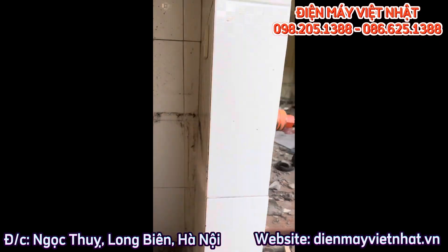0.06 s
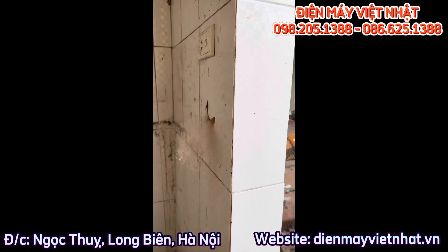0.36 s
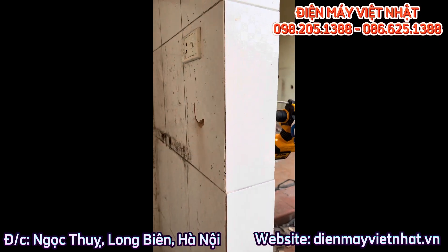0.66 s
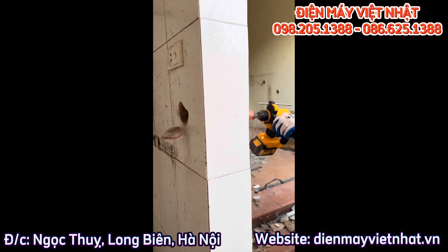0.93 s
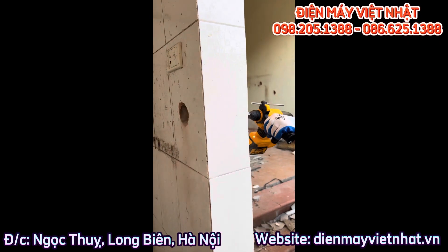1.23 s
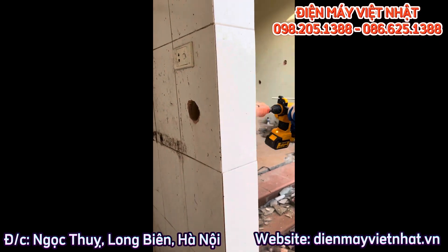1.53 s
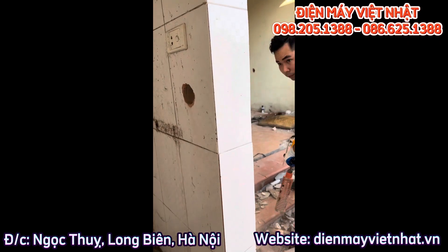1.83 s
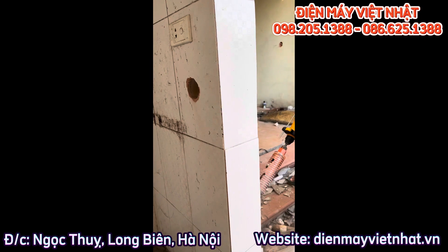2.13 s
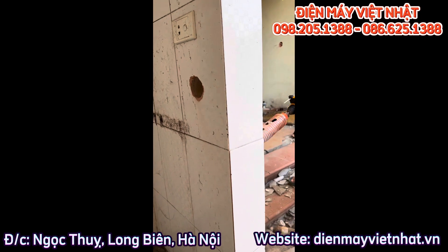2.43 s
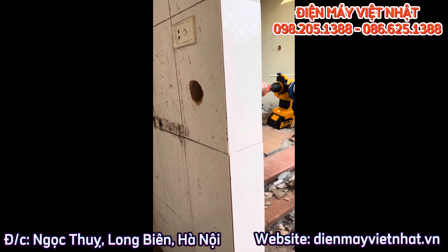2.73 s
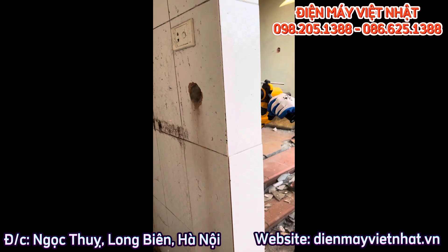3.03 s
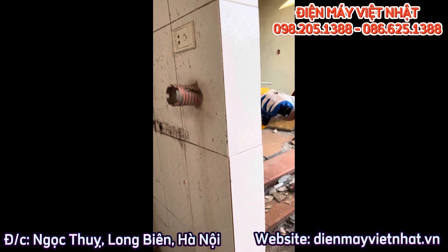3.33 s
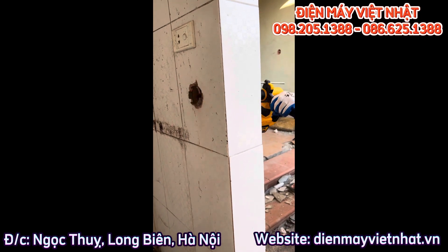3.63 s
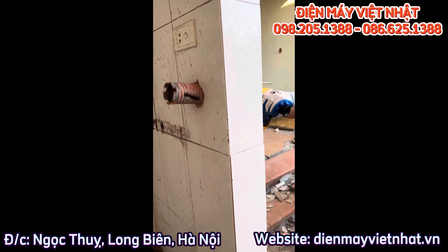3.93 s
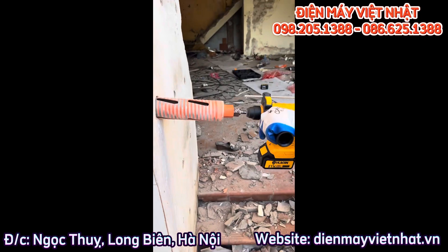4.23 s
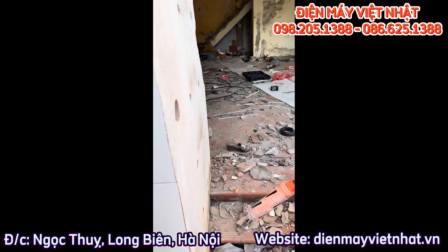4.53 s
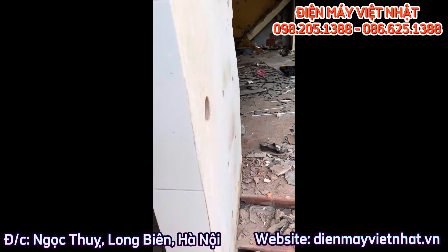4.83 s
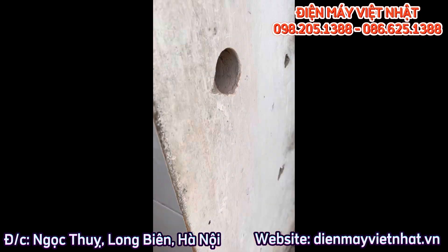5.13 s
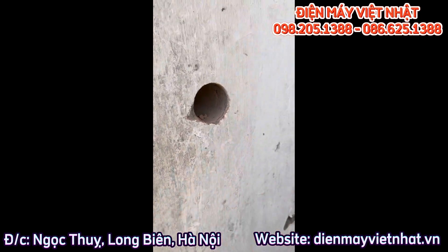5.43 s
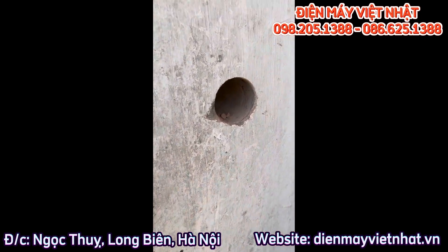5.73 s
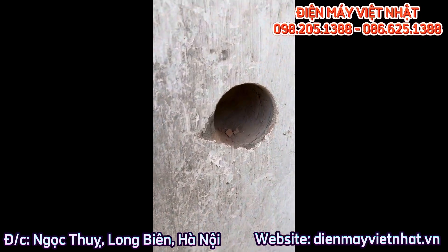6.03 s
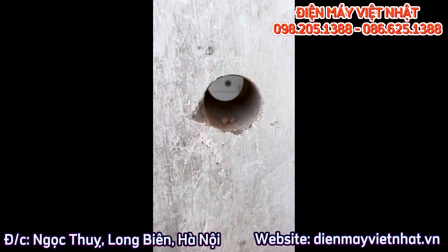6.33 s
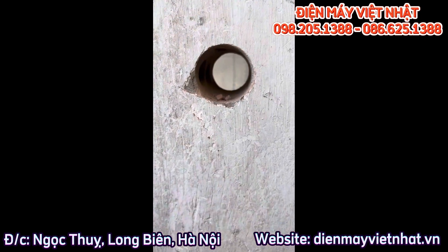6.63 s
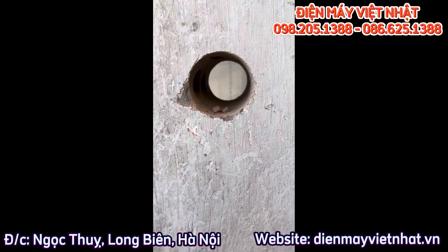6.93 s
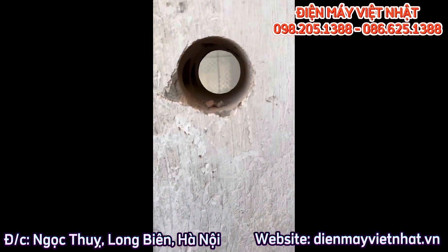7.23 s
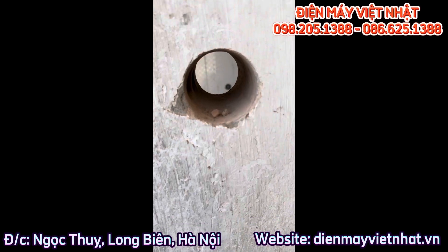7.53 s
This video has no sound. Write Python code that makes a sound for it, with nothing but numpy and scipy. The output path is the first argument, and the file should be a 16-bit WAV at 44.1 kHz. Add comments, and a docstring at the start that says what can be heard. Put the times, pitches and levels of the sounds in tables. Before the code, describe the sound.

Close up in a bare room, a hammer drill pounds and grinds against masonry in three quick runs. Gritty scrapes and small cracks fill a gap before one more run goes through the wall. The hollow steel bit rasps out of the hole, knocks the rim and gives a short metallic ring. Then shoes scuff and crunch across broken rubble, growing faint, while air lightly buffets the microphone.

```python
"""In a gutted room, a cordless rotary hammer drives a steel core bit through a tiled masonry wall.
Periodic impacts make the wall thud, while teeth crushing grit radiate broadband noise. The bit is
drawn out, put back, breaks through and rubs in the hole; friction and knocks excite the modes of its
tube, which rings as it comes free. Then steps crunch over rubble close by, a train of small
fractures, while air buffets the microphone."""
import sys
import numpy as np
from scipy import signal
from scipy.fft import rfft, irfft, next_fast_len
from scipy.io import wavfile
from scipy.ndimage import uniform_filter1d

SR = 44100
rng = np.random.default_rng(int(sys.argv[2]) if len(sys.argv) > 2 else 0)


def store_wav(level_fs):
    """Save 16-bit WAV to argv[1]."""
    pcm = np.round(np.clip(np.atleast_2d(level_fs), -1, 1) * 32767)
    wavfile.write(sys.argv[1], SR, pcm.T.astype(np.int16))


N = 342657
TIME = np.arange(N) / SR
CUTOFF_HZ = 15900
GRIT_SWING_DB, GRIT_SHIFTS_PER_S = 3.5, 45  # loose grit and a moving contact favour changing pitches

# Three pushes deep in the wall, then one through it. Each row: start, length and bite time in seconds,
# thud and grinding levels in dB, blows per second, and the sag of that rate per second.
PUSHES = [(-0.04, 0.34, 0.058, -32.5, -27, 69.5, 13.14), (0.385, 0.45, 0.033, -26.5, -26.5, 66.9, 1.79),
          (1.012, 0.33, 0.14, -30.5, -24.5, 67.2, 6), (2.929, 0.38, 0.053, -24, -21, 67.3, 1.82)]
# The bit slips and lands lightly. Each row: centre and half length in seconds, dip of the thud in dB.
SLIPS = [(1.213, 0.017, -11), (2.977, 0.033, -9.5), (3.22, 0.021, -4.5)]
def drilling():
    """Impact excitation: one train of blows drives both the wall's thud and the teeth's grinding."""
    blows = blow_count()
    slip_db = sum(db * np.exp(-np.minimum(((TIME - s) / half) ** 2, 20)) for s, half, db in SLIPS)
    thuds = amp(1 + slip_db) * wall_thuds(blows)
    teeth = amp(0.088 * slip_db) * grinding(blows) * amp([[.5], [-.5]])
    return thuds + teeth


def blow_count():
    """Phase is the integral of rate: blows so far, at a speed that sags and wavers under load."""
    speed = []
    for start, length, *_, rate, sag in PUSHES:
        speed += [(start, rate), (start + length, rate - sag * length)]
    return np.cumsum(curve(speed) * (1 + .007 * drift(35))) / SR


def contact_force(push, arch_db, fall_db_per_s, yield_db_per_s, break_s=3.122):
    """Force needs resistance: it arches over a push and fades once the wall gives way."""
    start, length, bite = push[:3]
    off_centre = np.clip(2 * (TIME - start) / length - 1, -1, 1)
    resistance = amp(-yield_db_per_s * np.maximum(TIME - break_s, 0))
    return stroke(start, length, bite, fall_db_per_s) * amp(-arch_db * off_centre ** 2) * resistance


def thud_gain(push, build_db=8.5):
    """Coupling to the wall grows as the teeth dig in, so the thud builds through a push."""
    start, length, _, thud_db = push[:4]
    dug_in = np.clip((TIME - start) / length, 0, 1) - .5
    force = contact_force(push, arch_db=5.5, fall_db_per_s=257, yield_db_per_s=42)
    return amp(thud_db + build_db * dug_in) * force


def grind_gain(push):
    """Grinding amplitude follows the contact force on the teeth."""
    return amp(push[4]) * contact_force(push, arch_db=0.5, fall_db_per_s=243.5, yield_db_per_s=26.5)


WALL_RATE_HZ = 67.1  # nominal blow rate
# The wall's response in each push, changing as the hole deepens.
# Each entry: level in dB at 1, 2, 3, .. times the nominal blow rate.
WALL_FIRST_DB = [-33.5, -20, -2, -9, -5, 1.5, -1, -1, 1.5, 0, 7.5, -10, -4]
WALL_SECOND_DB = [-41, -13.5, -10.5, -23, -5.5, -13.5, 3.5, -2, -6, -9, 0, -13, -14, -14]
WALL_THIRD_DB = [-38, -4.5, -7, -19, -5.5, -6.5, 2, -6, 3.5, -4.5, -2, -7, -8.5]
WALL_THIN_DB = [-27.5, -8, -9, -12, -12.5, -15, 8.5, -12.5, -7, -6.5, -15, -1, -15.5, -7]
def wall_thuds(blows, rattle_gain=0.36):
    """Forced vibration: the wall filters uneven blows and their rattle; harmonics waver under load."""
    thuds = 0
    for push, wall in zip(PUSHES, [WALL_FIRST_DB, WALL_SECOND_DB, WALL_THIRD_DB, WALL_THIN_DB]):
        clicks = rms_one(np.diff(np.floor(blows), prepend=0) * amp(1.4 * drift(50)))
        rattle = rms_one(np.exp(-(blows % 1) / 0.74) * rng.standard_normal(N))
        harmonics = [(k * WALL_RATE_HZ, db) for k, db in enumerate(wall, 1)]
        thud = colour(clicks + rattle_gain * rattle, harmonics + [(1500, -21.5), (3000, -48.5)])[0]
        thuds += thud_gain(push) * bending_waves(thud)
    return restless(thuds, WALL_RATE_HZ * np.arange(5, 15), swing_db=2.5, per_s=11)


def bending_waves(thud, delay_at_blow_rate_s=.1, spread=0.77):
    """Dispersion: lower bending waves travel more slowly through the wall, which smears each blow."""
    size = 2 * next_fast_len(N // 2 + 1)
    hz = np.fft.rfftfreq(size, 1 / SR)
    lag_cycles = 2 * delay_at_blow_rate_s * np.sqrt(hz * WALL_RATE_HZ)
    waves = rfft(thud, size) * np.exp(-2j * np.pi * lag_cycles)
    # above the bass, standing waves reach left and right out of phase
    side = irfft(waves * np.exp(1j * np.pi / 3.4) * hz ** 2 / (hz ** 2 + 220 ** 2))[:N]
    return irfft(waves)[:N] + spread * side * [[1], [-1]]


# Teeth on masonry, deep in the wall and breaking through. Each row: frequency in Hz, level in dB.
GRIND_DEEP = [(530, -17), (900, -2), (1130, -9.5), (1720, -7), (1890, -9.5), (2550, -6), (3400, -10.5),
              (5240, -3), (7510, -17.5), (8680, -11.5), (10600, -20), (14200, -12.5), (15800, -24)]
GRIND_THROUGH = [(530, -13.5), (900, -7), (2200, -13.5), (2490, -5), (3290, -11.5), (3530, -6), (4080, -7),
                 (5370, -3), (7420, -23.5), (8370, -15), (10600, -20.5), (14000, -11.5), (15800, -28.5)]
def grinding(blows):
    """Crushing noise is broadband: its colour keeps shifting and is brighter in the last push."""
    deep = crushed_grit(blows, GRIND_DEEP, pulsing=0.049, tube_db=-12) * sum(map(grind_gain, PUSHES[:-1]))
    through = crushed_grit(blows, GRIND_THROUGH, pulsing=0.055, tube_db=-4.5) * grind_gain(PUSHES[-1])
    teeth = amp(0.5) * deep + amp(1) * through
    return restless(teeth, np.geomspace(1500, 6500, 10), swing_db=1.9, per_s=28)


# Modes of the tube gripped by the hole. Each row: frequency and bandwidth in Hz, level in dB.
GRIPPED_MODES = [(2900, 210, -8), (3533, 70, 0.5), (5180, 70, -6), (5510, 110, -4), (5930, 200, -10),
                 (8600, 130, -13)]
def crushed_grit(blows, spectrum, pulsing, tube_db):
    """Random excitation: grit breaks, a little harder at each blow, and sets the gripped tube singing."""
    grit = grains(14000, 0.61, 500) * (1 + pulsing * np.cos(2 * np.pi * blows)) * amp(0.27 * drift(90))
    singing = sum(amp(db + 3.5 * drift(25)) * resonate(grit, hz, width) for hz, width, db in GRIPPED_MODES)
    return steel(colour(grit, spectrum)) + amp(tube_db) * rms_one(singing)


def steel(x, t60=0.025, share=0.35, size=3000):
    """High modal density: the tube's close upper modes give a metallic grain to what excites it."""
    modes = rng.standard_normal((1, size)) * amp(-60 * np.arange(size) / SR / t60)
    upper = signal.sosfiltfilt(signal.butter(2, 4500, "high", fs=SR, output="sos"), x)
    ringing = signal.oaconvolve(upper, modes / np.linalg.norm(modes), axes=1)[:, :N]
    return x + (np.sqrt(1 - share) - 1) * upper + np.sqrt(share) * ringing


# The motor picks up. Each row: start and length in seconds, level in dB.
HUMS = [(-0.02, 0.086, -35), (2.714, 0.019, -39), (2.959, 0.038, -31), (4.134, 0.03, -33.5)]
def motor(hum_hz=174, width_hz=22):
    """Narrowband resonance: the drill body gives a brief, rough hum as the motor picks up."""
    hum = resonate(resonate(rng.standard_normal(N), hum_hz, width_hz), hum_hz, width_hz)
    even = hum / np.sqrt(uniform_filter1d(hum ** 2, size=1500) + 1e-20)
    return even * sum(amp(db) * stroke(s, length, 0.026, fall_db_per_s=188.5) for s, length, db in HUMS)


# Spectrum of steel scraping over dust. Each row: frequency in Hz, level in dB.
SLIDE_SPECTRUM = [(88, -32.5), (150, -9), (480, -7), (1360, -12), (1780, -14), (2000, -8), (5520, -10.5),
                  (8470, -16.5), (10400, -25), (11600, -19), (14000, -17), (15800, -20)]
# The tube moves along the hole. Each row: start and length in seconds, level in dB,
# relative hiss of the steel edge in dB.
STROKES = [(0.3, 0.09, -39, 3.5), (0.847, 0.064, -35, 2.5), (0.948, 0.17, -41, 1.5), (1.448, 0.063, -43, 1),
           (1.556, 0.05, -39, 4.5), (1.627, 0.11, -57.5, -6), (1.818, 0.053, -46, -11),
           (1.91, 0.078, -36.5, 8.5), (1.989, 0.043, -40, -15), (2.706, 0.024, -46.5, 5.5),
           (2.772, 0.095, -51, 4), (2.881, 0.027, -40, -2), (3.307, 0.071, -35, 12),
           (3.395, 0.095, -40, -0.5), (3.564, 0.19, -46, -2), (3.646, 0.17, -33, 4.5),
           (3.818, 0.28, -35.5, 2.5), (4.051, 0.052, -30.5, -6), (4.133, 0.058, -41, 9),
           (4.208, 0.026, -36, 6.5), (4.267, 0.069, -33.5, -6), (4.39, 0.015, -32.5, 8.5)]
def sliding(edge_hz=8300, bore_hz=929):
    """Sliding friction excites the tube and the air in its bore; once freed, the tube sings louder."""
    dust = grains(12000, 1.7, 400) * amp(1.4 * drift(110))
    scrape = steel(colour(dust, SLIDE_SPECTRUM))
    scrape = restless(scrape, np.geomspace(600, 9000, 18), GRIT_SWING_DB, GRIT_SHIFTS_PER_S)
    powers = [(amp(db) * stroke(s, length, 0.034, fall_db_per_s=282)) ** 2 for s, length, db, _ in STROKES]
    hiss_gain = np.sqrt(sum(power * amp(edge_db) ** 2 for power, (*_, edge_db) in zip(powers, STROKES)))
    in_hole = band(scrape, edge_hz, "low") + amp(-18) * rms_one(resonate(dust, bore_hz, width_hz=25))
    freed = np.interp(TIME, [4.15, 4.25], [0, 1])
    rub = amp(-5 * freed) * in_hole + amp(-10 + 10 * freed) * tube_singing()
    return np.sqrt(sum(powers)) * rub - hiss_gain * band(scrape, edge_hz, "high")


# Modes of the free tube. Each row: frequency in Hz, level in dB, time to decay by 60 dB in seconds.
TUBE_MODES = [(1331, -3.5, 0.97), (1990, -9, 0.48), (2810, -8.5, 0.2), (3815, -6, 0.16), (4080, -6, 0.11),
              (4320, -6.5, 0.25), (4690, -7.5, 0.17), (5300, -14, 0.09), (6900, -11, 0.14),
              (8400, -7.5, 0.12), (11750, -9, 0.1), (13370, -6, .06)]
def tube_singing(loss_factor=0.0069):
    """Damping by rubbing widens the resonances; chatter favours now one mode, now another."""
    chatter = grains(350, 1.1, 400)
    modes = (resonate(chatter * amp(db + 4.5 * drift(22)), hz, loss_factor * hz) * np.sqrt(1000 / hz)
             for hz, db, _ in TUBE_MODES)
    return rms_one(sum(modes))


# The tube knocks the rim. Each row: start in seconds, level in dB, low-pass corner in Hz,
# damping by the wall in dB per second, contact time in seconds.
KNOCKS = [(2.073, -35.5, 800, 110, 0.0044), (3.79, -36, 14300, 500, 0.013), (4.285, -41, 7000, 110, 0.015),
          (4.407, -33, 7000, 13.5, 0.022)]
def rim_knocks(beat_hz=21):
    """Mode splitting: the slightly oval tube rings in beating pairs; each knock has its own brightness."""
    ring = sum(amp(db) * (struck(0, hz, t60) + [[.7], [.4]] * struck(0, hz + beat_hz, t60))
               for hz, db, t60 in TUBE_MODES)
    out = np.zeros((2, N))
    for s, db, top_hz, damping, contact_s in KNOCKS:
        damped = ring * np.minimum(TIME / contact_s, 1) * amp(-damping * np.minimum(TIME, 1))
        start = int(s * SR)
        out[:, start:] += amp(db) * band(damped, top_hz, "low")[:, :N - start]
    return out


# Soles drag over grit. Each row: peak in seconds, level in dB, rise in seconds, relative dust hiss in dB.
SCUFFS = [(2.24, -34, 0.012, 1), (4.68, -54.5, 0.069, 17.5), (4.837, -23.5, 0.012, 5),
          (4.986, -52.5, 0.021, 10), (5.194, -29, 0.03, 4), (5.297, -49, 0.035, 8.5),
          (5.556, -26, 0.008, -22), (5.62, -49, 0.075, 5.5), (5.761, -34, 0.015, 9),
          (5.795, -40, 0.04, 3.5), (5.953, -40.5, 0.0098, 14.5), (5.992, -37, 0.012, 4),
          (6.099, -27, 0.013, 8), (6.136, -19.5, 0.006, -10), (6.2, -43.5, 0.073, 5),
          (6.294, -41, 0.0069, 10), (6.504, -56, 0.036, 9), (6.632, -56, 0.006, 8.5),
          (7.45, -57, 0.06, 12.5), (7.546, -67, 0.0032, 24), (7.71, -67, 0.013, 18.5)]
# Spectrum of grit underfoot. Each row: frequency in Hz, level in dB.
SCUFF_SPECTRUM = [(76, -70.5), (130, 0.5), (434, 5), (731, 0.5), (912, 1.5), (1200, -4), (2210, -2),
                  (3170, -7.5), (6400, -16), (15800, -32.5)]
# A boot shifts its weight. Each row: peak in seconds, level in dB, rise and fall in seconds.
SHUFFLES = [(2.18, -53, 0.047, 0.097)]
def steps(dust_hz=5500, shuffle_hz=656):
    """Granular friction: soles crush grit, fine dust hisses above it and a boot shuffles dully."""
    grit = colour(grains(9000, 0.8, 890) * amp(0.8 * drift(220)), SCUFF_SPECTRUM)
    grit = restless(grit, np.geomspace(400, 4000, 10), GRIT_SWING_DB, GRIT_SHIFTS_PER_S)
    swells = scuff_gains()
    dust_gain = sum(gain * amp(dust_db) for gain, (*_, dust_db) in zip(swells, SCUFFS))
    dull_grit = rms_one(band(band(grit, shuffle_hz, "low"), shuffle_hz, "low"))
    shuffle = sum(swell(*row) for row in SHUFFLES) * dull_grit
    return sum(swells) * band(grit, dust_hz, "low") - dust_gain * band(grit, dust_hz, "high") + shuffle


def scuff_gains(fall_per_rise=1.47):
    """Decay time scales with rise time, so slow scuffs last longer."""
    return [swell(s, db, rise, fall_per_rise * rise) for s, db, rise, _ in SCUFFS]


# Chips of masonry break, and a few sharp ticks come from the bit (near 1.97, 2.84 and 4.79 s). Each row: peak
# in seconds, crack and knock levels in dB, pitch in Hz.
CHIPS = [(0.399, -27, -22, 710), (1.029, -36, -31.5, 584), (1.4777, -22.5, -28, 2520),
         (1.538, -39.5, -49, 950), (1.966, -27.5, -30, 11500), (2.2448, -32.5, -26.5, 1560),
         (2.43, -50.5, -50, 2400), (2.837, -38, -40, 645), (3.752, -36, -28.5, 510),
         (4.724, -33, -33, 3900), (4.792, -29, -34, 1890), (4.833, -26.5, -21, 608),
         (5.283, -45, -35, 1920), (5.384, -39.5, -27.5, 454), (5.569, -32.5, -28, 452),
         (5.609, -29, -27.5, 716), (5.679, -33, -43, 440), (5.719, -42, -42, 2200), (5.917, -33, -31, 650),
         (5.9587, -24, -30, 475), (5.993, -40, -29, 2080), (6.1032, -18, -20, 2320),
         (6.1313, -19.5, -13.5, 2104), (6.139, -23, -15.5, 482), (6.221, -39, -41, 2400),
         (6.262, -37.5, -31.5, 1320), (6.4509, -32.5, -34.5, 1626), (6.4975, -37, -32, 910),
         (6.512, -43, -35, 5800)]
def chips(rise_s=0.0023, fall_s=0.0039, lead_in_s=0.0086, trail_s=0.012, size=6000):
    """Brittle fracture: a chip snaps and knocks; big ones sound duller and longer. The bit's few sharp ticks
    are played the same way."""
    lead = size // 4
    age = (np.arange(size) - lead) / SR
    rise = np.exp(-np.minimum((np.minimum(age, 0) / rise_s) ** 2, 20))
    snap = rise * np.exp(-np.maximum(age, 0) / fall_s)
    # a faint noise swells into each snap and trails off
    skirt = amp(-9.5) * np.exp(-np.where(age < 0, -age / lead_in_s, age / trail_s))
    out = np.zeros((2, N + size))
    for s, crack_db, knock_db, hz in CHIPS:
        noise = rng.standard_normal((3, size))
        top_hz = 5500 * (hz / 1000) ** .15
        burst = rms_one(band(band(noise[2] + noise[:2], top_hz, "low"), 280, "high"))
        burst = rms_one(burst + amp(-6) * rms_one(resonate(burst, hz, hz / 2)))  # takes on the chip's pitch
        crack = amp(crack_db) * burst * np.hypot(snap, skirt)
        start = int(s * SR) - lead
        out[:, start:start + size] += crack + amp(knock_db) * rise * chip_modes(age, hz)
    return amp(-1) * out[:, :N]


def chip_modes(age, hz, ring_s=0.0025, ring_cycles=2.7):
    """Heavy damping: up to five inharmonic modes of a chip die away within milliseconds."""
    modes = 0
    for ratio in np.array([1, .62, 1.4, 2, 2.9]) * np.r_[1, rng.uniform(.88, 1.12, 4)]:
        mode_hz = hz * ratio
        cycles = mode_hz * age + rng.random() + .1 * rng.standard_normal((2, 1))
        decay = np.exp(-np.maximum(age, 0) / (ring_s + ring_cycles / mode_hz))
        modes += np.sin(2 * np.pi * cycles) * min(ratio, 1 / ratio) * decay * (mode_hz < CUTOFF_HZ)
    return modes / np.sqrt(2)


# Shards of tile. Each row: start in seconds, level in dB, pitch in Hz.
SHARDS = [(6.335, -38, 3530), (7.245, -60.5, 2783)]
def shards():
    """Free vibration: each shard clinks in a single mode."""
    return sum(amp(db) * struck(s, hz, t60=0.17) for s, db, hz in SHARDS)


def room(x, t60=0.22, top_hz=6000, size=20000):
    """Reverberation: reflections from bare walls merge into a short, dull tail."""
    age = np.arange(size) / SR
    tail = band(rng.standard_normal((2, size)), top_hz, "low") * amp(-60 * age / t60) * (age > .004)
    return signal.oaconvolve(x, tail / np.sqrt(np.sum(tail ** 2) / 2), axes=1)[:, :N]


# Spectrum of the rumble. Each row: frequency in Hz, level in dB.
BUFFET_SPECTRUM = [(12, -56.5), (20, -36), (124, 0), (211, -9), (290, -18), (450, -61.5)]
# Draught on the microphone. Each row: time in seconds, level in dB.
DRAUGHT = [(1.35, -61), (1.65, -75.5), (2.66, -72), (2.8, -52.5), (5.0, -59), (7.77, -56.5)]
# Puffs of air. Each row: peak in seconds, level in dB, rise and fall in seconds.
PUFFS = [(4.135, -34.5, 0.028, 0.047)]
def buffeting(puff_hz=85):
    """Slow pressure fluctuations: draught, puffs, the shaking wall and footfalls make a lumpy rumble."""
    rumble = colour(grains(8000, 0.84, 400), BUFFET_SPECTRUM) * amp(0.88 * drift(25))
    puffs = sum(swell(*row) for row in PUFFS) * rms_one(band(rumble, puff_hz, "low"))
    shaking = amp(-24) * sum(map(thud_gain, PUSHES)) + amp(-25) * sum(scuff_gains())
    return (amp(2 + curve(DRAUGHT)) + shaking) * rumble + puffs


# Background, louder on the far side of the wall. Each row: time in seconds, level in dB.
AMBIENCE = [(2.6, -77.5), (5.0, -60.5), (7.77, -65.5)]
# Its spectrum. Each row: frequency in Hz, level in dB.
AMBIENCE_SPECTRUM = [(150, -28), (250, 6), (1230, -4.5), (1470, -10.5), (2560, -7), (4450, -11.5),
                     (10600, -30), (15800, -28)]
def ambience():
    """Superposition: dense impulses merge into a faint wash, while sparse ones tick as stray grit."""
    wash = colour(grains(17000, 1.1, 660), AMBIENCE_SPECTRUM)
    ticks = 0.064 * band(grains(40, 2, 900), 2500, "high")
    return amp(1 + curve(AMBIENCE)) * (wash + ticks)


def grains(per_s, spread_db, alike_hz):
    """Shot noise of uneven grains: the bass is shared, the treble differs from ear to ear."""
    sizes = (rng.random(N) < per_s / SR) * amp(spread_db * np.minimum(rng.exponential(1, N), 4))
    mid, side = rms_one(sizes * rng.standard_normal((2, N)))
    return mid + band(side, alike_hz, "high") * [[1], [-1]]


def struck(s, hz, t60):
    """Damped oscillation: a sine of height 1 starts at s and dies away."""
    age = np.clip(TIME - s, 0, 2 * t60)
    return np.sin(2 * np.pi * hz * age) * amp(-60 * age / t60) * (age < 2 * t60)


def stroke(start, length, attack_s, fall_db_per_s):
    """Sustained envelope: a smooth rise towards 1, then exponential decay once the stroke ends."""
    rise = np.clip((TIME - start) / attack_s, 0, 1)
    fall_db = np.minimum(fall_db_per_s * np.maximum(TIME - start - length, 0), 200)
    return rise ** 2 * (3 - 2 * rise) * amp(-fall_db)


def swell(s, db, rise, fall):
    """Transient envelope: a Gaussian rise to the peak at s, then exponential decay."""
    exponent = np.where(TIME < s, ((TIME - s) / rise) ** 2, (TIME - s) / fall)
    return amp(db) * np.exp(-np.minimum(exponent, 20))


def restless(x, centres, swing_db, per_s):
    """Amplitude modulation: each band swells and fades on its own, so the colour keeps shifting."""
    out, knots = x, np.arange(int(N / SR * per_s) + 2)
    for hz, spacing in zip(centres, np.gradient(centres)):
        gain = rms_one(amp(swing_db * rng.standard_normal(len(knots))))
        out = out + (np.interp(TIME * per_s, knots, gain) - 1) * resonate(x, hz, spacing / 2)
    return out


def colour(x, spectrum, size=4096):
    """Minimum-phase filtering imposes the spectrum causally; the result has rms 1."""
    hz, db = np.transpose(spectrum)
    grid = np.maximum(np.fft.rfftfreq(size, 1 / SR), 1)
    cepstrum = irfft(np.log(amp(np.interp(np.log(grid), np.log(hz), db))))
    cepstrum[1:size // 2] *= 2
    cepstrum[size // 2 + 1:] = 0
    impulse_response = irfft(np.exp(rfft(cepstrum)))
    return rms_one(signal.oaconvolve(np.atleast_2d(x), impulse_response[None], axes=1)[:, :N])


def resonate(x, hz, width_hz):
    """Resonance of a single damped mode."""
    r = np.exp(-np.pi * width_hz / SR)
    feedback = [1, -2 * r * np.cos(2 * np.pi * hz / SR), r * r]
    return signal.lfilter(np.array([1, 0, -1]) * (1 - r * r) / 2, feedback, x)


def band(x, hz, kind):
    """Second-order low-pass or high-pass filtering."""
    return signal.sosfilt(signal.butter(2, min(hz, SR / 2 - 1), kind, fs=SR, output="sos"), x + 1e-18)


def drift(per_s):
    """Random fluctuation of rms 1."""
    knots = rng.standard_normal(int(N / SR * per_s) + 2)
    return rms_one(np.interp(TIME * per_s, np.arange(len(knots)), knots))


def curve(rows):
    """Linear interpolation through (seconds, value) points."""
    return np.interp(TIME, *np.transpose(rows))


def amp(db):
    return 10 ** (np.asarray(db) / 20)


def rms_one(x):
    return x / np.sqrt(np.mean(x ** 2) + 1e-20)


def scene():
    """Linear superposition of tool, rubble and air; only the rubble is given reverberation."""
    rubble = (steps() + chips() + shards()) * amp([[.5], [-.5]])
    tool = drilling() + motor() + sliding() + rim_knocks()
    return tool + rubble + amp(-16) * room(rubble) + buffeting() + ambience()


# The sound cuts out for an instant. Each row: start and end in seconds.
GAPS = [(4.11, 4.120), (4.132, 4.142)]
def record(dry):
    """Gating and band limiting: the sound cuts out twice, and a steep filter removes the top treble."""
    muted = sum((TIME > start) & (TIME < end) for start, end in GAPS)
    gate = 1 - .95 * uniform_filter1d(muted * 1.0, size=40)
    return signal.sosfilt(signal.ellip(10, .1, 80, CUTOFF_HZ, fs=SR, output="sos"), dry * gate)


dry = scene()
out = record(dry)
store_wav(out)
```